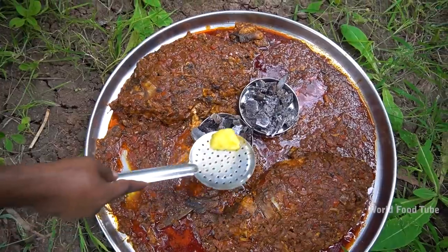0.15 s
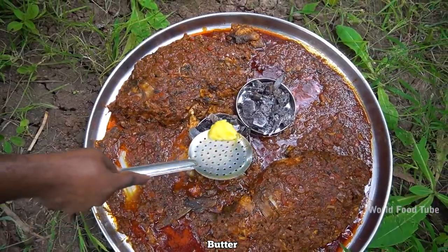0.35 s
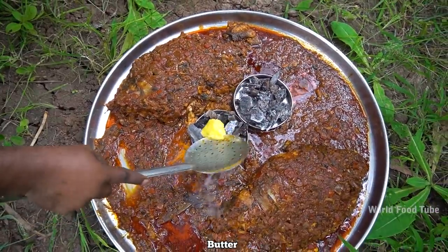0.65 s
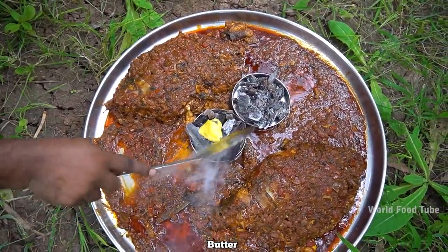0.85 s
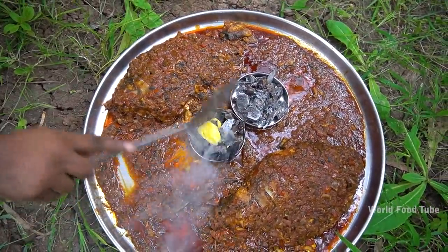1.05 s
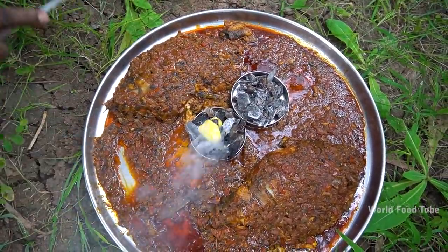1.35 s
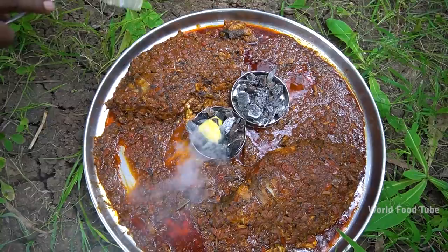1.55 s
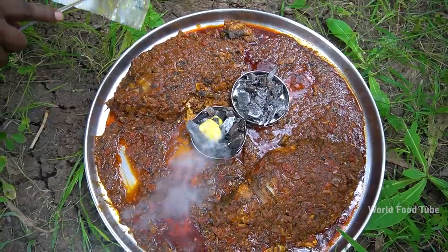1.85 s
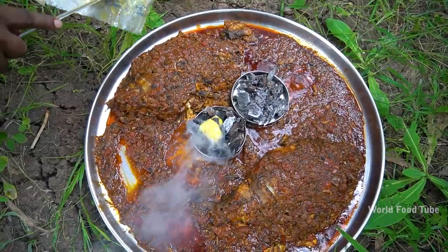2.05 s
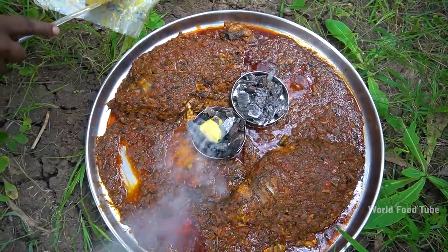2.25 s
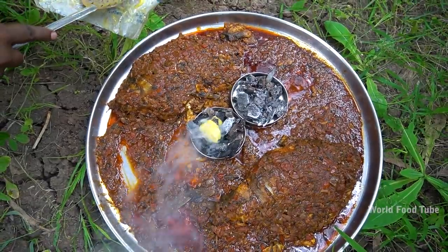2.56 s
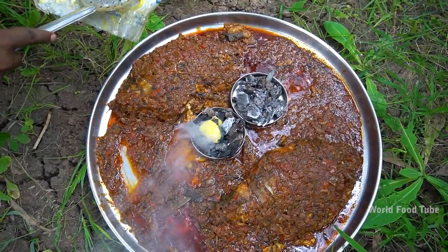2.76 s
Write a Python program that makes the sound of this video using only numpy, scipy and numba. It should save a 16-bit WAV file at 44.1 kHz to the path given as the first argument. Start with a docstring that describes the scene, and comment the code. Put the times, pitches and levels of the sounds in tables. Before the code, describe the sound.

Butter sizzles on hot charcoal in small metal cups, with fine hiss, bubbling crackle and sharp spits of fat; close stereo microphone outdoors. The sizzle abruptly becomes slower and deeper twice, growing slightly louder.

```python
"""Butter sizzling on charcoal

Butter melts onto glowing charcoal in small metal cups outdoors, heard by a close stereo microphone.
Steam is flickering band noise, bubbles are brief rings, crackles are clicks; plops ring longer.
Fat spits as ringing clicks with spray, splutters are puffs of noise, and cup resonances colour the sizzle.
Three spliced parts play at full speed, then slower twice, so pitch and treble step down."""
import sys
import numpy as np
from scipy import signal
from scipy.fft import rfft, irfft
from scipy.io import wavfile
from scipy.ndimage import uniform_filter1d
from numba import njit

SR = 44100
rng = np.random.default_rng(int(sys.argv[2]) if len(sys.argv) > 2 else 0)


def dump(signal):
    """Clip the signal to [-1, 1] and save it as 16-bit WAV at the path in sys.argv[1]."""
    limited = np.clip(np.atleast_2d(signal).T, -1, 1)
    pcm = np.round(limited * 32767).astype(np.int16)
    wavfile.write(sys.argv[1], SR, pcm)


N = 127890

# Spliced parts. Each row: start in seconds, left minus right in dB.
PARTS = [(0, -4), (1.346, -3.5), (2.558, -3.5)]
# Playing speed of each part, as a share of real time.
SPEEDS = [1, .625, .3125]
# Sizzle level over time, one table a part. Each row: time in seconds, level in dB,
# extra above MIDDLE_HZ in dB, further extra above TREBLE_HZ in dB.
HEAT = [
    [(0, -44.5, -5.5, -15), (.05, -44, -2, -18), (.065, -43, -4, -0.5), (.16, -45.5, -0.5, -8),
     (.23, -45, -0.5, -8), (.3, -45.5, -0.5, -11), (.315, -44, 4.5, -9), (.43, -45, 4.5, -8),
     (.46, -43.5, 0, -6.5), (.6, -44.5, 2.5, -4.5), (.9, -44.5, 2, -3.5), (1.04, -43, 2, -1.5),
     (1.1, -43.5, 0.5, 0.5), (1.35, -43, 1.5, -1.5)],
    [(1.35, -40.5, -2, 3), (1.6, -41, 1, 1), (1.7, -43, 2.5, -2), (1.85, -41, 1.5, -0.5),
     (2.15, -41.5, 1, -0.5), (2.22, -38.5, -2, -0.5), (2.35, -42, -0.5, -0.5), (2.56, -42, 0.5, -1.5)],
    [(2.56, -38.5, 0.5, -2.5), (2.62, -39, -0.5, -0.5), (2.7, -41, -2, 4.5), (2.8, -40, -0.5, -1),
     (2.9, -40.5, 0, 2)],
]
# Sizzle colour at real speed. Each row: frequency in Hz, gain in dB.
COLOUR_GAIN = [(40, -29.5), (130, -16), (300, -8.5), (600, -0.5), (1000, -3), (3000, -4.5), (7000, -6),
               (12000, -4.5), (18500, -5.5), (20500, -10.5), (21600, -16)]
# Hollow cup resonances at real speed. Each row: frequency in Hz, width in Hz, lift in dB.
CUP_RESONANCES = [(1323, 170, 3.5), (1890, 490, 4), (3350, 400, 2), (5200, 800, 2.8), (9100, 900, 2.5)]
# Loud spits of fat, levels before the cup colour.
# Each row: time in seconds, ring level in dB, pitch as heard in Hz, spray level in dB.
SPITS = [(0.0878, -28.5, 6400, -39), (0.1694, -25.5, 5500, -37), (0.1857, -28.0, 7500, -40),
         (0.2152, -31.0, 4900, -42), (0.2898, -33.0, 5700, -40), (0.3089, -30.5, 7500, -43),
         (0.3564, -25, 1900, -35), (0.5925, -22.0, 10500, -37), (0.6873, -26.0, 7400, -35),
         (0.7698, -27.0, 7700, -36), (0.782, -24.5, 7400, -40), (1.135, -25.5, 6600, -36),
         (1.3886, -23.0, 7500, -37), (1.5928, -24.0, 7800, -36), (1.6589, -20.5, 7100, -30),
         (1.6797, -25.0, 2800, -30), (1.7399, -12.5, 7800, -25), (1.7565, -27.0, 5400, -33),
         (1.7769, -27.0, 2600, -33), (1.8216, -24.5, 4600, -32), (1.9029, -22.0, 7000, -37),
         (1.9283, -23.0, 5700, -31), (1.98, -21, 10000, -36), (1.9998, -26.0, 6900, -33),
         (2.0573, -21.0, 7500, -29), (2.0871, -24.0, 7300, -38), (2.1533, -26.0, 6000, -34),
         (2.2239, -22.5, 6800, -29), (2.277, -22, 10000, -36), (2.2853, -20, 11500, -36),
         (2.369, -21, 10500, -38), (2.5535, -25.5, 7900, -39), (2.6486, -25.5, 4400, -35),
         (2.673, -27.5, 4300, -34), (2.7774, -21.0, 3200, -26), (2.8163, -24.5, 3400, -34),
         (2.8464, -26.5, 3600, -36)]
# Rounder splutters. Each row: time in seconds, level in dB, pitch as heard in Hz.
SPLUTTERS = [(.217, -45, 5100), (.356, -46.5, 2150), (0.463, -47, 1500), (0.548, -44, 2230),
             (0.602, -45, 940)]
# Stereo width. Each row: frequency at real speed in Hz, side gain over mid in dB.
SIDE_GAIN = [(40, -29), (130, -16.5), (400, -10), (1000, -7), (16000, -7)]
# Left minus right, added to that of the part. Each row: frequency at real speed in Hz, difference in dB.
LEAN = [(100, 3), (1500, 3), (8000, 1.8)]

# Sizzle rates and filter frequencies are at real speed.
SPLICE_S = 0.019
SURGES_PER_S, SURGE_SCALE_DB = 40, 1.08
FLICKERS_PER_S, FLICKER_SCALE_DB = 25, 1.36
BUBBLES_PER_S, BUBBLE_DB, BUBBLE_SPREAD_DB, BUBBLE_CYCLES = 3000, -7, 1.5, 3.85
BUBBLE_LOW_HZ, BUBBLE_HIGH_HZ = 730, 21150
CRACKLES_PER_S, CRACKLE_DB, CRACKLE_SPREAD_DB = 500, -11, 4.5
PLOPS_PER_S, PLOP_DB, PLOP_CYCLES, PLOP_LOW_HZ, PLOP_HIGH_HZ = 300, -12.5, 13.8, 889, 12000
MAX_SPREADS = 2.8  # cap on random sizes
SPIT_CYCLES, SPIT_TAIL_S, SPIT_LOW_HZ = 1.6, .0006, 950
SPLUTTER_S, SPLUTTER_HALF_WIDTH = 0.01, 0.13  # half-width as a share of pitch
MIDDLE_HZ, TREBLE_HZ, SLOWED_TOP_HZ = 2440, 7660, 22000
TOP_HZ = 15700  # as heard


def undb(db):
    """dB to amplitude."""
    return 10 ** (np.asarray(db) / 20)


def unit(x):
    """Scale to an RMS of 1."""
    return x / np.sqrt(np.mean(x ** 2))


def along(table, hz):
    """Read a table of Hz and dB on a log frequency axis."""
    table_hz, table_db = np.array(table).T
    return np.interp(np.log(hz + 1), np.log(table_hz), table_db)


def walk(rate_hz):
    """Random levels held 1 / rate_hz seconds, smoothed twice."""
    hold = int(SR / rate_hz)
    steps = np.repeat(rng.standard_normal(1000), hold)[:N]
    return 0.78 * uniform_filter1d(uniform_filter1d(steps, hold), hold)


def random_times(draws, per_s):
    """Sample indices with exponential gaps, from uniform draws."""
    gaps = -np.log(draws)
    return (np.cumsum(gaps) / per_s * SR).astype(np.int64)


def random_sizes(draws, spread_db):
    """Amplitudes with a capped exponential spread in dB, from uniform draws."""
    return undb(spread_db * np.minimum(-np.log(draws), MAX_SPREADS))


def steep(x, hz):
    """Steep elliptic low-pass."""
    sos = signal.ellip(12, .2, 90, min(hz, .499 * SR), fs=SR, output="sos")
    return signal.sosfilt(sos, x)


def causal(x, db):
    """Minimum-phase filter from a gain curve in dB, by folding its cepstrum."""
    cepstrum = irfft(db * np.log(10) / 20)
    half = len(cepstrum) // 2
    cepstrum[1:half] *= 2
    cepstrum[half + 1:] = 0
    response = irfft(np.exp(rfft(cepstrum)))
    return signal.fftconvolve(x, response[None], axes=1)[:, :N]


@njit
def rings(at, hz, cycles, size, n, sr):
    """Sum of decaying cosines, each down by e^2 after the given cycles."""
    y = np.zeros(n)
    for k in range(len(at)):
        turn = np.exp(complex(-hz[k] / cycles / sr * 2, 2 * np.pi * hz[k] / sr))
        z = complex(size[k], 0)
        end = min(n, at[k] + int(3 * cycles * sr / hz[k]) + 2)
        for i in range(at[k], end):
            y[i] += z.real
            z *= turn
    return y


def hiss(speed, surge):
    """Steam: half-octave noise bands surge together and flicker separately."""
    hz = np.fft.rfftfreq(N, 1 / SR)
    noise = rfft(rng.standard_normal(N))
    # end bands take all below and above
    band = np.round(2 * np.log2(hz / speed / 500 + 1e-9)).clip(0, 11)
    out = 0
    for k in range(12):
        flicker = undb(FLICKER_SCALE_DB * walk(FLICKERS_PER_S * speed))
        out = out + irfft(noise * (band == k), N) * flicker
    return unit(out * surge)


def bursts(speed, surge):
    """Bubbles ring briefly, pitches spread evenly in Hz; crackles are single clicks of either sign."""
    gap, pitch, size, click_gap, click_size = rng.random((12000, 5)).T
    at = random_times(gap, BUBBLES_PER_S * speed)
    hz = speed * (BUBBLE_LOW_HZ + (BUBBLE_HIGH_HZ - BUBBLE_LOW_HZ) * pitch)
    sizes = random_sizes(size, BUBBLE_SPREAD_DB) * np.sqrt(hz)
    bubbles = unit(rings(at, hz, 1. * BUBBLE_CYCLES, sizes, N, 1. * SR))

    at = random_times(click_gap, CRACKLES_PER_S * speed)
    sizes = random_sizes(click_size, CRACKLE_SPREAD_DB) * np.sign(pitch - .5)
    crackles = unit(np.bincount(at, sizes)[:N])
    return surge * (undb(BUBBLE_DB) * bubbles + undb(CRACKLE_DB) * crackles)


def plops(speed):
    """Bubbles in the pooled fat: fewer, longer rings, at pitches spread evenly in octaves."""
    gap, pitch, size = rng.random((3000, 3)).T
    at = random_times(gap, PLOPS_PER_S * speed)
    hz = speed * PLOP_LOW_HZ * (PLOP_HIGH_HZ / PLOP_LOW_HZ) ** pitch
    sizes = random_sizes(size, BUBBLE_SPREAD_DB) * hz
    return undb(PLOP_DB) * unit(rings(at, hz, 1. * PLOP_CYCLES, sizes, N, 1. * SR))


def spits(speed):
    """Fat spits: a click rings a few cycles with a short decaying spray; thin in the bass."""
    s, ring_db, hz, spray_db = np.array(SPITS).T
    at = (s * SR).astype(np.int64)
    ring = rings(at, hz, 1. * SPIT_CYCLES, undb(ring_db), N, 1. * SR)
    fade = np.exp(-speed / (SPIT_TAIL_S * SR))
    envelope = signal.lfilter([1], [1, -fade], np.bincount(at, undb(spray_db), N))
    spray = envelope * rng.standard_normal(N) / np.sqrt(speed)
    thin = signal.butter(1, SPIT_LOW_HZ * speed, "high", fs=SR, output="sos")
    return signal.sosfilt(thin, ring + spray)


def sizzle(speed, surge):
    """One channel of steam, bubbles, crackles and plops; all but the plops surge."""
    return hiss(speed, surge) + bursts(speed, surge) + plops(speed)


def cup_lift_db(hz):
    """Hollow cups: a resonant peak in dB at each of their pitches."""
    return sum(db / (1 + (2 * (hz - f) / w) ** 2) for f, w, db in CUP_RESONANCES)


def part(speed, pan_db, heat):
    """One playing speed scales sizzle pitches, rates and filters; spits keep their times and pitches."""
    t = np.arange(N) / SR
    s, level_db, middle_db, treble_db = np.array(heat).T
    hz = np.fft.rfftfreq(2048, 1 / SR) / speed  # at real speed
    colour = along(COLOUR_GAIN, hz) + cup_lift_db(hz)

    surge = undb(SURGE_SCALE_DB * walk(SURGES_PER_S * speed))
    mid = causal(sizzle(speed, surge)[None], colour)[0]
    side = causal(sizzle(speed, surge)[None], colour + along(SIDE_GAIN, hz))[0]
    pair = np.array([mid + side, mid - side])

    # level reference: mid within 400-6500 Hz, before the tilts
    reference = signal.butter(4, [400, 6500], "band", fs=SR, output="sos")
    scale = np.std(signal.sosfilt(reference, mid))
    for edge_hz, db in ((MIDDLE_HZ, middle_db), (TREBLE_HZ, treble_db)):
        split = signal.butter(2, edge_hz * speed, fs=SR, output="sos")
        low = signal.sosfiltfilt(split, pair)
        pair = low + (pair - low) * undb(np.interp(t, s, db))
    pair = pair * undb(np.interp(t, s, level_db)) / scale

    # spits take the cup lift, and the colour slope only above TREBLE_HZ
    spit_colour = colour - along(COLOUR_GAIN, np.minimum(hz, TREBLE_HZ))
    pair = pair + causal(spits(speed)[None], spit_colour)
    lean = (pan_db + along(LEAN, hz)) / 2
    pair = np.vstack([causal(pair[:1], lean), causal(pair[1:], -lean)])
    return steep(pair, SLOWED_TOP_HZ * speed)


def splutters():
    """Puffs of band noise around one pitch, under a Gaussian envelope."""
    t, out = np.arange(N) / SR, 0
    for s, db, hz in SPLUTTERS:
        edges_hz = [hz * (1 - SPLUTTER_HALF_WIDTH), hz * (1 + SPLUTTER_HALF_WIDTH)]
        band = signal.butter(1, edges_hz, "band", fs=SR, output="sos")
        noise = unit(signal.sosfilt(band, rng.standard_normal(N)))
        out = out + undb(db) * np.exp(-((t - s) / SPLUTTER_S) ** 2) * noise
    return out


def scene():
    """Parts joined by short equal-power cross-fades, plus centred splutters."""
    t = np.arange(N) / SR
    rise = [np.ones(N)]
    rise += [np.clip((t - start_s) / SPLICE_S + .5, 0, 1) for start_s, _ in PARTS[1:]]
    rise += [np.zeros(N)]
    out = 0
    for k, (_, pan_db) in enumerate(PARTS):
        fade = np.sin(np.pi / 2 * (rise[k] - rise[k + 1]))
        out = out + fade * part(SPEEDS[k], pan_db, HEAT[k])
    return out + splutters()


def record(dry):
    """Cut steeply above TOP_HZ."""
    return steep(dry, TOP_HZ)


dry = scene()
out = record(dry)
dump(out)
```